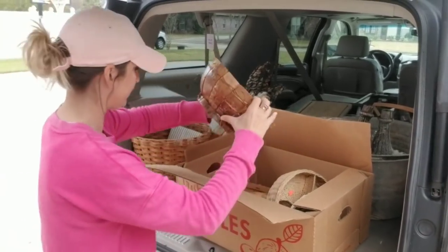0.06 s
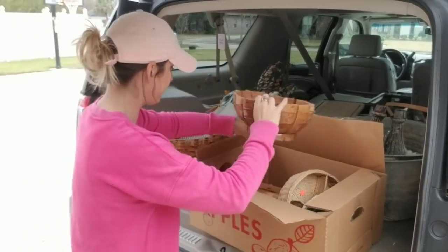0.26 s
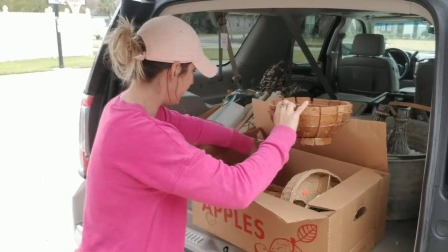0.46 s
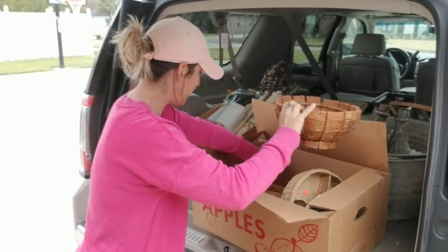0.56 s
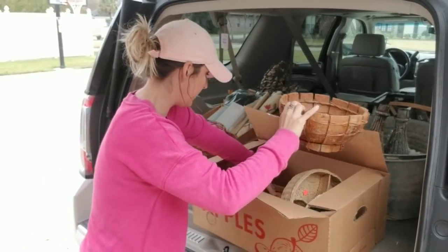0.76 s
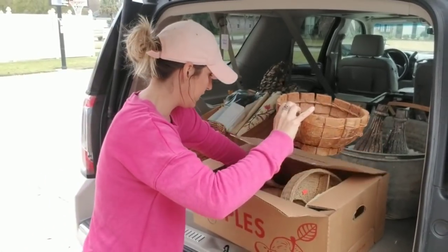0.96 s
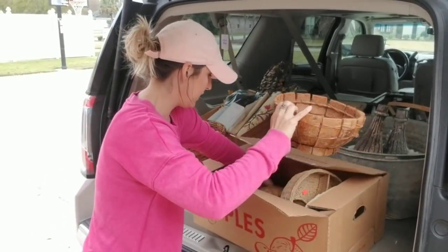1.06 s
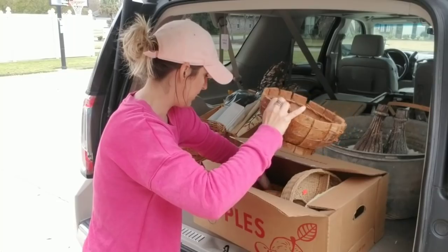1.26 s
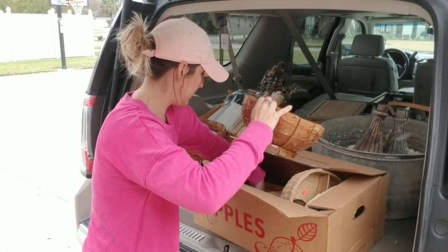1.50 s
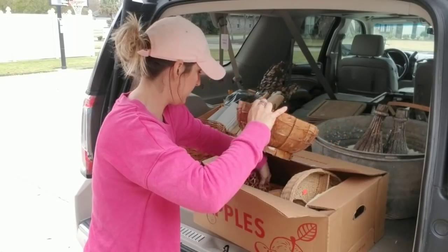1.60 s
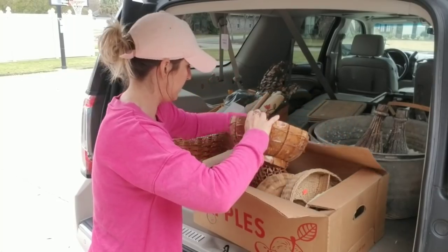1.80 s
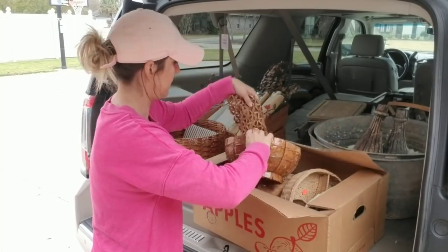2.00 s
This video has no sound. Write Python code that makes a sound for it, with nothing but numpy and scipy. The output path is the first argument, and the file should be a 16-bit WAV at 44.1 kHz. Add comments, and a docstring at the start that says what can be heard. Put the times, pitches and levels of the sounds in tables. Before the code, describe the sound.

Woven baskets handled in a cardboard box outdoors, with crackles, hollow knocks, rasping cardboard and low wind buffeting

```python
"""Outdoors, at the open back of a car, baskets are handled in a cardboard box.
Sliding wicker is random friction pulses, heard as crackle, as rasp and through the box's resonances as drone.
Blows excite decaying modes of the box walls, rims tap together, strands snap and a splint squeaks by stick-slip.
Decaying noise gives the short tail of the car's cabin; shaped noise gives the wind buffeting the microphone
and a faint steady outdoor background."""
import sys
import numpy as np
from scipy import signal
from scipy.fft import rfft, irfft
from scipy.io import wavfile
from scipy.ndimage import uniform_filter1d

SR = 44100
rng = np.random.default_rng(int(sys.argv[2]) if len(sys.argv) > 2 else 0)


def generate_wav(signal):
    """Clip the signal to [-1, 1] and save it as 16-bit WAV at the path in sys.argv[1]."""
    frames = np.transpose(np.atleast_2d(signal))
    scaled = np.clip(frames, -1, 1) * 32767
    pcm = np.round(scaled).astype(np.int16)
    wavfile.write(sys.argv[1], SR, pcm)


N = 90316
TIME = np.arange(N) / SR  # s
BINS = np.fft.rfftfreq(4096, 1 / SR)  # Hz

# Sliding strokes: (start [s], rise [s], hold [s], release to -60 dB [s],
# wicker crackle level [dB], cardboard rasp level [dB], box drone level [dB])
STROKES = [(0.01, 0.037, 0.015, 0.41, -53.5, -69, -59), (0.133, 0.01, 0.042, 0.12, -49.5, -72, -82),
           (0.175, 0.011, 0.0077, 0.11, -43.5, -55.5, -61), (0.244, 0.003, 0.008, 0.22, -55.5, -67, -56.5),
           (0.297, 0.02, 0.035, 0.23, -60, -78, -59), (0.655, 0.031, 0.051, 0.19, -44.5, -41, -33.5),
           (0.76, 0.0067, 0.047, 0.44, -51, -48.5, -38), (0.786, 0.0072, 0.0081, 0.14, -64, -56, -29.5),
           (0.894, 0.01, 0.024, 0.63, -63.5, -55, -43.5), (1.109, 0.029, 0.084, 0.72, -61.5, -55, -48.5),
           (1.272, 0.023, 0.01, 0.15, -65, -63, -43.5), (1.436, 0.023, 0.0071, 0.12, -41, -36.5, -42.5),
           (1.482, 0.0078, 0.0083, 0.071, -58, -41.5, -34), (1.503, 0.019, 0.056, 0.22, -47.5, -47.5, -42),
           (1.61, 0.029, 0.026, 0.43, -48, -42.5, -43), (1.68, 0.081, 0.1, 0.14, -45, -40, -40.5),
           (1.874, 0.013, 0.031, 0.8, -43, -39, -39), (1.967, 0.011, 0.0074, 0.093, -46, -35, -37)]
# Spectrum of sliding wicker: (frequency [Hz], relative level [dB])
CRACKLE_COLOUR = [(200, 1.5), (600, -7.5), (1400, -11.5), (2500, 2), (3500, -1.5), (5000, -0.5),
                  (7300, 4.5), (8500, -2), (10500, -1.5), (12000, -31.5)]
# Spectrum of rubbed cardboard: (frequency [Hz], relative level [dB])
RASP_COLOUR = [(100, -27), (200, -3), (300, -2.5), (375, -4), (460, 4), (650, -1.5), (1000, -1.5),
               (1500, -5.5), (2300, -8), (3200, -9), (6000, -18), (12000, -41)]
# Resonances of the box under a sliding basket: (frequency [Hz], relative level [dB], bandwidth [Hz])
DRONE_MODES = [(160, -0.5, 18), (204, 2, 9.3), (241.7, 1.5, 12.3), (301, -6, 34), (461, -4, 58)]
# Moving resonance of the box, set by where the basket presses: (time [s], frequency [Hz])
PRESS_PITCH = [(0.72, 232), (0.82, 216), (0.93, 165), (1.3, 207), (1.55, 297), (2.0, 260)]
PRESS_WIDTH_HZ = 130

# Knocks on the box: (time [s], relative level [dB], low-pass cutoff [Hz])
KNOCKS = [(0.7592, -0.5, 1270), (0.877, 2, 1460), (0.8829, 0, 1140), (1.0945, -4, 770), (1.104, 3, 623),
          (1.2525, -6.5, 680), (1.263, -1, 577), (1.352, -10.5, 590), (1.362, -6, 520), (1.484, -2.5, 660),
          (1.548, -13.5, 2500), (1.576, -8.5, 574), (1.783, -7.5, 1180), (1.848, -6, 804)]
# Wall modes of the box: (nominal frequency [Hz], relative level [dB], decay to -60 dB [s])
BOX_MODES = [(162.1, 1.5, 0.18), (204.7, 0.5, 0.14), (244.5, 2.5, 0.13), (321, -1, 0.086),
             (446.6, -1, 0.14), (514, -5.5, 0.16), (583.5, -0.5, 0.13), (697, -7.5, 0.14),
             (771, -5.5, 0.082), (890, -5.5, 0.13), (1037, -9, 0.12), (1104, 0, 0.1), (1259, -7, 0.14)]
# Spectrum of a dead blow on cardboard: (frequency [Hz], relative level [dB])
BLOW_COLOUR = [(30, -15), (70, 5), (130, 4), (220, 6.5), (370, -4.5), (470, -3.5), (1100, -8),
               (2000, -13.5), (12000, -30)]
WALL_DETUNE = 0.012  # scale of the random detuning, as a fraction of frequency

# Soft bumps of a hand or basket: (time [s], length [s], level [dB], frequency [Hz])
THUMPS = [(0.376, 0.016, -32, 214), (0.490, 0.014, -33.5, 161), (0.764, 0.026, -28.5, 191),
          (1.427, 0.012, -29, 136)]
THUMP_WET_DB = -12

# Taps of rim on rim: (time [s], relative level [dB])
CLACKS = [(1.549, -5), (1.6225, 0), (1.632, -5)]
# Rim modes: (frequency [Hz], relative level [dB], decay to -60 dB [s])
RIM_MODES = [(1480, -9, .05), (2030, -3, .05), (2200, 0, .07), (2400, -1, .06)]
CLACK_DB = -41

# Snaps of the weave: (time [s], relative level [dB], centre frequency [Hz], half-width [octaves])
SNAPS = [(0.143, -20, 5900, 1.1), (0.2361, -16, 3800, 4.7), (0.6142, -14.5, 7500, 1.28),
         (0.6611, -13.5, 4700, 1.4), (0.6958, -15.5, 6300, 0.65), (0.7605, -12.5, 6740, 0.6),
         (0.88, -15.5, 5460, 0.73), (0.965, -24, 7250, 0.74), (1.094, -12, 6260, 4.4),
         (1.255, -20.5, 4470, 1.7), (1.4503, -6, 5300, 1.3), (1.548, -5, 2000, 0.85),
         (1.558, -16.5, 1880, 0.32), (1.598, -14.5, 8800, 0.54), (1.6219, -14.5, 2500, 0.6),
         (1.684, -11, 7560, 0.46), (1.7352, -16, 5940, 0.69), (1.885, -15.5, 5400, 0.44),
         (1.973, -6, 5560, 0.37), (1.981, -2.5, 3970, 0.56)]
STRAND_TOP_HZ = 10060  # the thinnest strands ring no higher

# Slips of one stiff splint: (time [s], relative level [dB])
SLIPS = [(0.5234, 0), (0.525, -0.5), (0.528, -0.5), (0.533, -13), (0.5372, -1.5)]
# Modes of the splint: (frequency [Hz], relative level [dB], decay to -60 dB [s])
SPLINT_MODES = [(5280, -0.5, 0.0077), (5880, -5, .012), (6470, -7, 0.0057)]
# Spectrum of the splint's scrape: (frequency [Hz], relative level [dB])
SCRAPE_COLOUR = [(500, -49), (2500, -12.5), (3400, -12.5), (3900, -5.5), (4700, -0.5), (5300, -11),
                 (6600, -6), (7300, -16), (10500, -5), (12000, -21)]
SLIP_S = 0.0031  # the push rises in half this time; the scrape then decays with this time constant
SQUEAK_WET_DB = 0

# Reverberation of the cabin: (frequency [Hz], decay to -60 dB [s])
CABIN_DECAY = [(150, 0.11), (400, 0.056), (1000, 0.2), (2800, 0.15), (7300, 0.13)]
# Likeness of the two channels' reflections: (frequency [Hz], correlation [0-1])
CABIN_SAME = [(100, 1), (350, 0.97), (700, 0), (1400, 0), (3000, 0.08), (10000, 0)]
LEFT_LEAD_S = 1.0e-4

# Wind on the microphone: (time [s], level before WIND_DB is added [dB])
WIND_LEVEL = [(0.0, -40.5), (0.26, -51), (0.28, -32), (0.34, -41.5), (0.39, -36.5), (0.53, -38),
              (0.57, -34.5), (0.61, -55.5), (0.65, -33.5), (0.67, -51), (0.77, -31), (0.79, -40.5),
              (0.97, -36.5), (1.04, -44.5), (1.08, -56), (1.12, -41), (1.19, -53.5), (1.24, -43),
              (1.35, -54), (1.4, -37.5), (1.54, -58.5), (2.03, -52), (2.05, -49)]
# Spectrum of the wind: (frequency [Hz], relative level [dB])
WIND_COLOUR = [(10, -31.5), (25, -15), (42, -2.5), (62, 5), (80, 1.5), (120, -9), (200, -21.5), (320, -40),
               (700, -49.5), (3000, -83)]
# Single gusts: (time [s], length [s], level [dB])
GUSTS = [(0.271, 0.04, -24.5), (0.383, 0.038, -22.5), (0.552, 0.036, -30)]
WIND_DB, GUST_HZ = 5.5, 60.9  # level offset; rate of the pressure swing inside a gust
WIND_SAME = 0.13  # share of the wind's power common to both channels

# Spectrum of the outdoor background: (frequency [Hz], relative level [dB])
AIR_COLOUR = [(30, 10.5), (200, -6.5), (400, -9.5), (1000, -13), (1800, -22), (3000, -18.5), (7000, -12.5),
              (12000, -24)]
AIR_DB = -56.5
CUTOFF_HZ = 11800


def amp(db):
    """Decibel law: a level in dB becomes an amplitude ratio."""
    return 10 ** (np.asarray(db) / 20)


def unit(x):
    """Normalization to a root-mean-square value of 1."""
    return x / np.sqrt(np.mean(x ** 2) + 1e-20)


def read(points, hz):
    """Linear interpolation of a table along a logarithmic frequency axis."""
    f, value = np.transpose(points)
    return np.interp(np.log(hz + 1), np.log(f), value)


def add(mix, s, sound):
    """Superposition: adds a sound to the mix, in place, from time s."""
    part = mix[max(round(s * SR), 0):][:len(sound)]
    part += sound[:len(part)]


def ring(db):
    """Minimum phase: a magnitude spectrum fixes a causal response, here of energy 1."""
    log_gain = np.log(amp(np.maximum(db - db.max(), -100)))
    both_sides = np.r_[log_gain, log_gain[-2:0:-1]]
    h = np.fft.ifft(np.exp(np.conj(signal.hilbert(both_sides)))).real
    return h / np.linalg.norm(h)


def colour(x, points):
    """Linear filtering: a body shapes its excitation by convolution with its response."""
    return signal.fftconvolve(x, ring(read(points, BINS)))[:len(x)]


def burst(t60, lead):
    """Impact: a first contact and a dying chatter of smaller ones, of total energy 1."""
    t = TIME[:SR // 8]
    x = rng.standard_normal(len(t)) * amp(-60 * t / t60)
    x /= np.linalg.norm(x)
    x[0] += lead
    return x / np.linalg.norm(x)


def modes(table, t, decay_t):
    """Modal superposition: sinusoids of random phase over t, each decaying exponentially over decay_t."""
    return sum(amp(level - 60 * decay_t / t60) * np.sin(2 * np.pi * (hz * t + rng.random()))
               for hz, level, t60 in table)


def sliding():
    """Sliding friction: each stroke crackles in the wicker, rasps on the cardboard and makes the box drone."""
    power = np.zeros((3, N))
    for start, rise, hold, release, *levels in STROKES:
        onset = np.clip((TIME - start) / rise, 0, 1)
        decay = amp(-60 * np.maximum(TIME - start - rise - hold, 0) / release)
        power += (amp(levels)[:, None] * onset * decay) ** 2
    wicker, card, box = np.sqrt(power)
    wicker_slips = friction(per_s=3100, spread_db=4.5, flutter_db=-0.5, flutter_hz=115)
    card_slips = friction(per_s=1100, spread_db=0.5, flutter_db=2.5, flutter_hz=77.4)
    box_slips = friction(per_s=900, spread_db=0.5, flutter_db=-1.0, flutter_hz=41.0)
    crackle = colour(wicker * wicker_slips, CRACKLE_COLOUR)
    rasp = colour(card * card_slips, RASP_COLOUR)
    drone = box * hollow(box_slips)
    return (scatter(cabin(crackle, wet_db=-3, left_db=2.5), t60=0.0046)
            + cabin(rasp, wet_db=-4.5, left_db=0.6)
            + cabin(drone, wet_db=-2.5, left_db=1.0))


def friction(per_s, spread_db, flutter_db, flutter_hz):
    """Stick-slip at many contacts: random uneven slips, clumped as strands catch and let go."""
    happens = rng.random(N) < per_s / SR
    size = amp(spread_db * np.minimum(rng.exponential(1, N), np.pi))
    slips = happens * rng.choice([-1, 1], N) * size
    low_pass = signal.butter(2, flutter_hz, fs=SR, output="sos")
    clumps = unit(signal.sosfilt(low_pass, rng.standard_normal(N)))
    return unit(slips * amp(flutter_db * clumps))


def hollow(x):
    """Sustained resonance: rubbing drives the box evenly and the point of pressure picks its resonances."""
    t = TIME[:SR // 3]
    body = sum(amp(db) * np.sqrt(width) * np.exp(-np.pi * width * t) * np.sin(2 * np.pi * hz * t)
               for hz, db, width in DRONE_MODES)
    driven = signal.fftconvolve(x, body)[:N]
    # Shift the moving resonance to 0 Hz, low-pass, and shift back
    press_hz = np.interp(TIME, *np.transpose(PRESS_PITCH))
    turn = np.exp(2j * np.pi * np.cumsum(press_hz) / SR)
    r = np.exp(-np.pi * PRESS_WIDTH_HZ / SR)
    drone = (turn * signal.lfilter([1 - r], [1, -r], driven / turn)).real
    drone = signal.sosfilt(signal.butter(2, [130, 600], "band", fs=SR, output="sos"), drone)
    # Even out the strength over some tens of milliseconds
    strength = uniform_filter1d(uniform_filter1d(unit(drone) ** 2, size=1300), size=700)
    return drone / np.sqrt(strength + 0.01) / np.std(drone)


def knocks(thud_t60=0.064, thud_db=-2):
    """Impact on a hollow body: ringing wall modes and a dead thud, low-passed for each contact."""
    out, t = np.zeros(N), TIME[:SR // 3]
    for s, db, bright_hz in KNOCKS:
        walls = np.zeros(len(t))
        for hz, level, t60 in BOX_MODES:
            detuned_hz = hz * (1 + WALL_DETUNE * rng.uniform(-0.77, 1))
            phase = rng.uniform(-1.26, 1.47)
            walls += amp(level - 60 * t / t60) * np.sin(2 * np.pi * detuned_hz * t + phase)
        blow = walls / np.linalg.norm(walls)
        add(blow, 0, amp(thud_db) * colour(burst(thud_t60, lead=0.1), BLOW_COLOUR))
        low_pass = signal.butter(3, bright_hz, fs=SR, output="sos")
        add(out, s, amp(db) * signal.sosfilt(low_pass, blow))
    return cabin(out * amp(-4.0), wet_db=-5, left_db=0.5)


def thumps():
    """Short soft impact: contacts push the cardboard for a few low cycles that stop quickly."""
    out = np.zeros(N)
    for s, length, db, hz in THUMPS:
        t = TIME[TIME < length]
        push = np.sin(np.pi * t / length)
        add(out, s, amp(db) * push * np.sin(2 * np.pi * (hz * t + rng.random())))
    return cabin(out, THUMP_WET_DB, left_db=0)


def clacks():
    """Modal decay after impact: two wooden rims tap each other and ring briefly."""
    out, t = np.zeros(N), TIME[:SR // 8]
    for s, db in CLACKS:
        add(out, s, amp(db) * modes(RIM_MODES, t, decay_t=t))
    return cabin(out * amp(CLACK_DB), wet_db=-1, left_db=2)


def snaps():
    """Impulsive excitation of a broad resonance: single strands of the weave flick past each other."""
    out = np.zeros(N)
    for s, db, hz, octaves in SNAPS:
        distance = np.log2((BINS + 1) / hz) / octaves
        strand = ring(-10 * np.log10(1 + distance ** 4 + (BINS / STRAND_TOP_HZ) ** 20))
        add(out, s, amp(db) * signal.fftconvolve(burst(t60=0.017, lead=1.0), strand))
    return scatter(cabin(out * amp(-4.5), wet_db=1, left_db=3.5), t60=0.0058)


def squeak(ring_db=-30, scrape_db=-17):
    """Stick-slip: each slip of a stiff splint scrapes and sets its modes ringing."""
    tone, scrape, t = np.zeros(N), np.zeros(N), TIME[:SR // 25]
    after = np.maximum(t - SLIP_S / 2, 0)  # decay starts once the push is full
    for s, db in SLIPS:
        push = amp(db) * np.sin(np.pi / 2 * np.minimum(2 * t / SLIP_S, 1))
        add(tone, s, push * modes(SPLINT_MODES, t, decay_t=after))
        noise = rng.standard_normal(len(t)) / np.sqrt(SLIP_S * SR)
        add(scrape, s, push * np.exp(-after / SLIP_S) * noise)
    both = amp(ring_db) * tone + amp(scrape_db) * colour(scrape, SCRAPE_COLOUR)
    # Louder on the left, with no time lead between channels
    return cabin(both, SQUEAK_WET_DB, left_db=3.5, lead_s=0)


def scatter(pair, t60):
    """Scattering: close reflections off box flaps and hands differ in phase between the channels."""
    t = TIME[:SR // 50]
    paths = rng.standard_normal((2, len(t))) * amp(-60 * t / t60)
    # Keep only the phase, so that the spectrum stays nearly flat
    flat = irfft(np.exp(1j * np.angle(rfft(paths, 2 * len(t)))))[:, :len(t)]
    return signal.fftconvolve(pair, flat / np.linalg.norm(flat, axis=1)[:, None], axes=1)[:, :N]


def cabin(x, wet_db, left_db, lead_s=LEFT_LEAD_S):
    """Reverberation: direct sound plus the car's short tail, with channel level and time differences."""
    hz, t, z = signal.stft(rng.standard_normal((2, SR // 3)), SR, nperseg=256)
    same = np.clip(read(CABIN_SAME, hz), 0, 1)[:, None]
    z = np.array([z[0], same * z[0] + np.sqrt(1 - same ** 2) * z[1]])
    z = z * amp(-60 * t / read(CABIN_DECAY, hz)[:, None])
    tail = signal.istft(z, SR, nperseg=256)[1]
    tail = tail * np.minimum(TIME[:tail.shape[1]] / 0.00037, 1)  # brief build-up
    wet = signal.fftconvolve(x[None], tail / np.linalg.norm(tail[0]), axes=1)[:, :N]
    direct = np.array([x, np.interp(TIME - lead_s, TIME, x)])
    balance = amp([[left_db / 2], [-left_db / 2]])
    return balance * (direct + amp(wet_db) * wet) / np.sqrt(1 + amp(wet_db) ** 2)


def wind():
    """Turbulence: low noise, mostly separate in each channel; a gust is a short, deep swing of pressure."""
    level = amp(np.interp(TIME, *np.transpose(WIND_LEVEL)) + WIND_DB)
    # One extra second lets the filter settle
    shared, left, right = [unit(colour(rng.standard_normal(N + SR), WIND_COLOUR)[SR:]) for _ in range(3)]
    eddies = np.sqrt(WIND_SAME) * shared + np.sqrt(1 - WIND_SAME) * np.array([left, right])
    strength = uniform_filter1d(uniform_filter1d((eddies ** 2).mean(0), size=1500), size=1000)
    out = level * eddies / np.sqrt(strength)
    for s, length, db in GUSTS:
        phase = rng.random() + rng.random((2, 1)) / 2  # in cycles, differing between channels
        swing = np.sin(2 * np.pi * (GUST_HZ * (TIME - s) + phase))
        out += amp(db) * np.sin(np.pi * np.clip((TIME - s) / length, 0, 1)) ** 2 * swing
    return out


def air():
    """Stationary noise: a faint, steady outdoor background."""
    return amp(AIR_DB) * cabin(colour(rng.standard_normal(N), AIR_COLOUR), wet_db=10.5, left_db=1.5)


def scene():
    """Superposition of baskets, box and weather."""
    return sliding() + knocks() + thumps() + clacks() + snaps() + squeak() + wind() + air()


def record(dry):
    """Band limitation: a linear-phase low-pass filter removes the highest frequencies."""
    low_pass = signal.firwin(255, CUTOFF_HZ, window=("kaiser", 8), fs=SR)
    return signal.oaconvolve(dry, low_pass[None], "same")


dry = scene()
out = record(dry)
generate_wav(out)
```